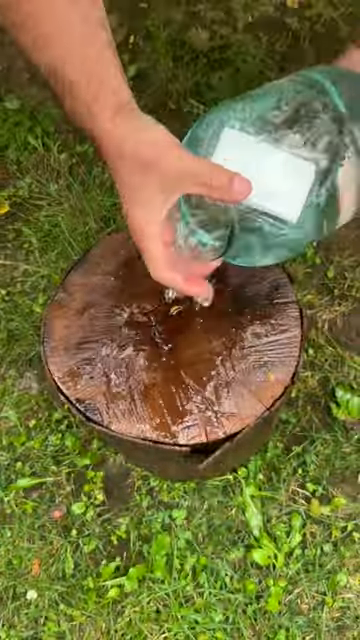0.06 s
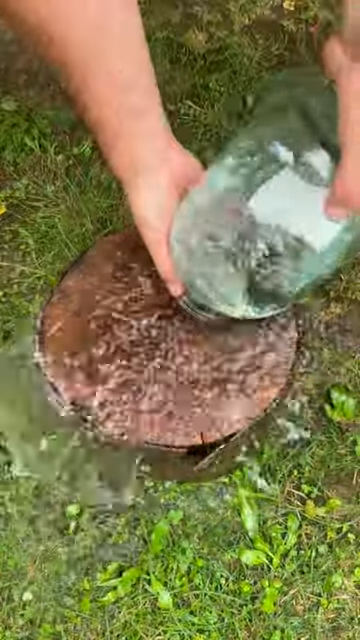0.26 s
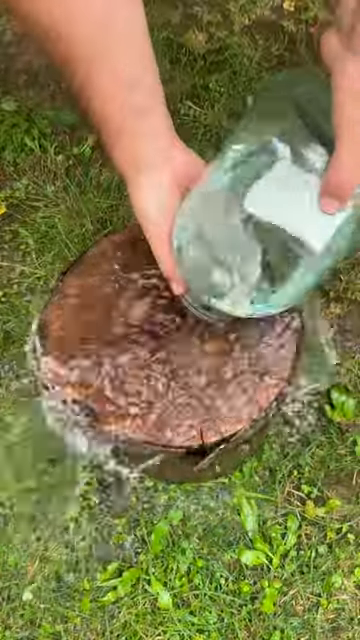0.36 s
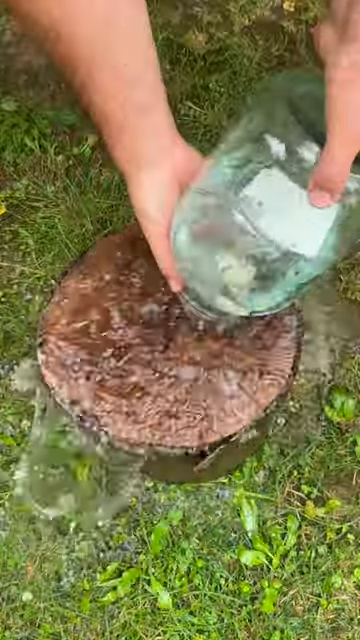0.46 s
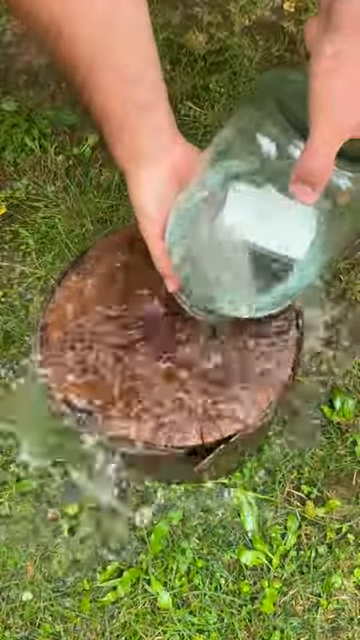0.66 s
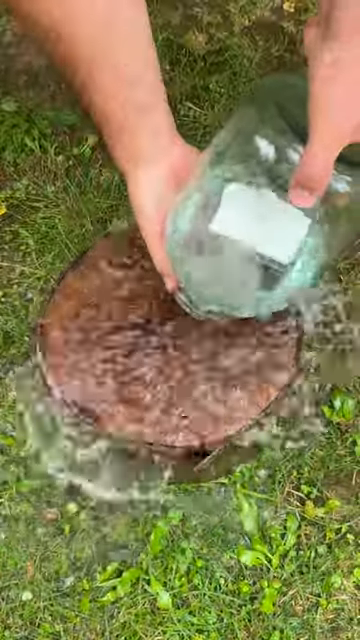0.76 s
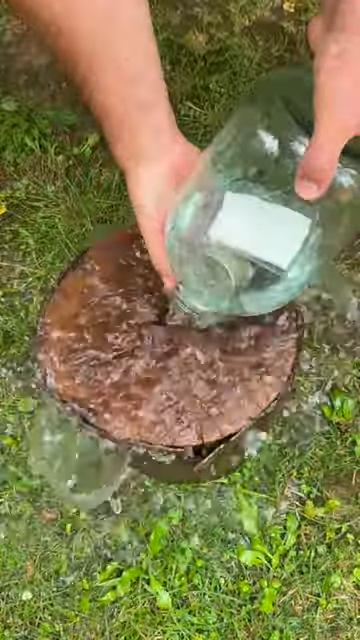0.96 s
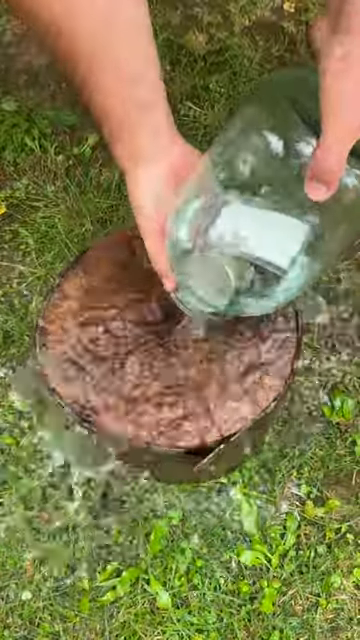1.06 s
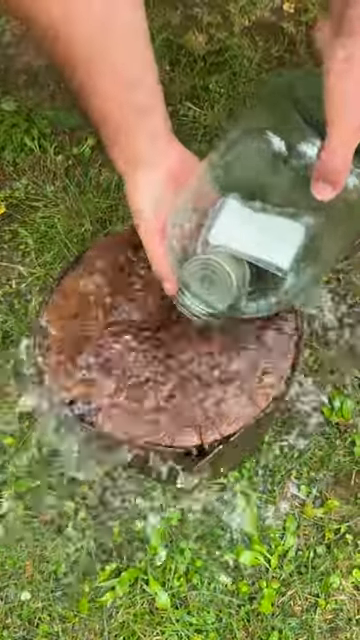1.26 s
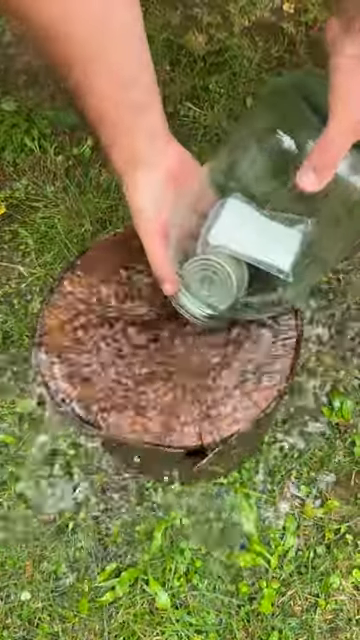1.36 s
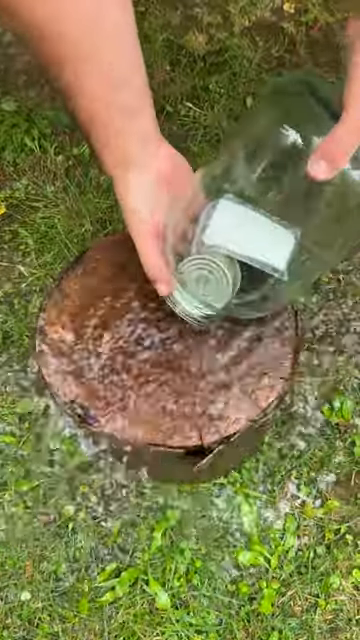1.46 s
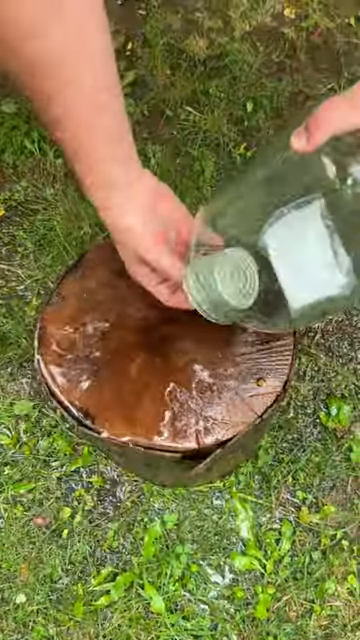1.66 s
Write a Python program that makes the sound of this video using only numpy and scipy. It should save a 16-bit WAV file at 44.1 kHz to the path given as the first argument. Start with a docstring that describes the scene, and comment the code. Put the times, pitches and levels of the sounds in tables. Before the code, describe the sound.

Gurgling water pours out of a glass jar, spattering on wood and grass outdoors.

```python
"""Over faint open air and a low drumming, water spatters on a stump and wet grass at arm's length.
It pours from a big upended glass jar: air gulps in through the neck in falling bubble notes and low
thumps, while water churns inside, slaps the glass and makes it ring. The flow thins to a patter,
and the empty jar knocks lightly in the hands. A puff of wind dies away on the microphone pair."""
import sys
import numpy as np
from scipy import signal
from scipy.fft import rfft, irfft, next_fast_len
from scipy.io import wavfile
from scipy.ndimage import map_coordinates

SR = 44100
rng = np.random.default_rng(int(sys.argv[2]) if len(sys.argv) > 2 else 0)


def pcm_store(signal):
    """Save signal as 16-bit PCM."""
    levels = np.round(np.clip(np.atleast_2d(signal), -1, 1) * 32767)
    wavfile.write(sys.argv[1], SR, levels.astype(np.int16).T)


N = 74970
T = np.arange(SR // 5) / SR  # time within one short sound [s]


def amp(db):
    return 10 ** (np.asarray(db) / 20)


def unit(x):
    return x / np.sqrt(np.mean(x ** 2) + 1e-20)


def along(points, hz):
    """Read (frequency, value) points on a log axis."""
    f, v = np.transpose(points)
    return np.interp(np.log(hz + 1), np.log(f + 1), v)


def level(rows):
    """Gain per sample from (time [s], level [dB]) points."""
    return amp(np.interp(np.arange(N) / SR, *np.transpose(rows)))


def wobble(per_s, size):
    """A smooth random curve with per_s knots a second."""
    return map_coordinates(rng.standard_normal(size), [np.arange(size) * per_s / SR], mode="wrap")


def filtered(x, response):
    """Filter x by a function of frequency."""
    n = x.shape[-1]
    padded = next_fast_len(n + 4096)
    return irfft(rfft(x, padded) * response(np.fft.rfftfreq(padded, 1 / SR)), padded)[..., :n]


def coloured(x, spectrum):
    """x shaped by a spectrum, at rms 1."""
    return unit(filtered(x, lambda hz: amp(along(spectrum, hz))))


def noise(spectrum, size):
    """Noise with a spectrum, at rms 1."""
    return coloured(rng.standard_normal(size), spectrum)


def noise_band(hz, octaves):
    """A short noise around one pitch, at rms 1."""
    white = rng.standard_normal(len(T))
    return unit(filtered(white, lambda f: 1 / (1 + (np.log2((f + 1) / hz) / octaves) ** 2) ** 2))


def add(track, s, sound):
    """Mix a sound into a track at time s."""
    i = max(0, round(s * SR))
    track[i:i + len(sound)] += sound[:max(0, N - i)]


def swell(seconds):
    """Rises to 1 in the given time, then dies away."""
    u = T / seconds
    return (u * np.exp(1 - u)) ** 2


def decay(t60):
    """Falls 60 dB in t60 seconds."""
    return amp(-60 * T / t60)


def tone(hz):
    """A sine that follows a pitch curve."""
    return np.sin(2 * np.pi * (np.cumsum(hz) / SR + rng.random()))


# Likeness of the sound at the two microphones (frequency [Hz], correlation [0-1])
MIC_LIKENESS = [(1000, 0.98), (7000, 0.97), (8200, 0.77)]

def spread(pair):
    """Two unrelated signals become a partly alike left and right."""
    turn = lambda hz: np.arccos(np.clip(along(MIC_LIKENESS, hz), -1, 1)) / 2
    mid, side = filtered(pair, lambda hz: np.array([np.cos(turn(hz)), np.sin(turn(hz))]))
    return np.array([mid + side, mid - side])


# Open air all around the stump (frequency [Hz], level [dB])
AIR_SPECTRUM = [(25, -57), (55, -22), (100, -8), (1200, -15), (15000, -41)]

def outdoors(air_db=-56, wind_hz=54.3, wind_db=-46.5, fade_db_per_s=22):
    """Faint open air and a dying puff of wind on the microphone."""
    wind_band = lambda hz: 1 / (1 + (2 * np.log2((hz + 1) / wind_hz)) ** 4)
    puff = unit(filtered(rng.standard_normal(N), wind_band))
    air = spread(noise(AIR_SPECTRUM, (2, N)))
    return amp(air_db) * air + amp(wind_db - fade_db_per_s * np.arange(N) / SR) * puff


# Drumming from the ground under the jar (time [s], level [dB])
DRUM_LEVEL = [(0, -52), (.22, -47.5), (.26, -42.5), (.6, -40.5), (1.05, -36), (1.25, -49), (1.6, -46.5),
              (1.7, -50)]
# Its deep colour (frequency [Hz], level [dB])
DRUM_SPECTRUM = [(25, -24), (50, -10.5), (75, 1.5), (170, -3.5), (350, -15), (2000, -58)]

def drumming():
    """Falling water drums low on stump and soil."""
    return level(DRUM_LEVEL) * noise(DRUM_SPECTRUM, N)


def bubble(hz, swell_s, fall, tail=0):
    """An air pocket rings, losing `fall` of log pitch per swell time; the share `tail` rings on."""
    t = T[T < 16 * swell_s]
    envelope = (1 - tail) * swell(swell_s) + tail * swell(3 * swell_s)
    pitch = hz * np.exp(-fall * (np.minimum(t / swell_s, 6) - 1))
    return envelope[:len(t)] * tone(pitch)


def bubbles(per_s, centre_hz, octaves, swell_cycles, spread_db, fall):
    """A random stream of bubbles around one pitch, at rms 1."""
    out = np.zeros(N)
    for when, pitch, size in rng.random((int(per_s * N / SR), 3)):
        hz = centre_hz * 2 ** (octaves * (2 * pitch - 1))
        add(out, when * N / SR, amp(spread_db * size) * bubble(hz, swell_cycles / hz, fall))
    return unit(out)


# Spatter on the stump and the grass around it (time [s], level [dB])
SPATTER_LEVEL = [(.11, -65), (.168, -37.5), (.26, -36), (.42, -41), (.59, -35), (.765, -40), (.99, -35),
                 (1.235, -45.5), (1.27, -35.5), (1.33, -42.5), (1.42, -37), (1.455, -47.5), (1.55, -41),
                 (1.58, -60.5), (1.7, -66)]
# Bright spray, heard close (frequency [Hz], level [dB])
SPRAY_SPECTRUM = [(600, -16), (1800, -4), (3000, -3.5), (5300, -5.5), (7500, -5.5), (11000, -1),
                  (16000, -4.5)]

def spatter(drops_per_s=2200, drop_spread_db=4.5):
    """Clumps of droplet clicks and fine wet hiss, with the pings of tiny bursting bubbles."""
    hits = rng.random((2, N)) < drops_per_s / SR
    sizes = amp(drop_spread_db * np.minimum(rng.standard_normal((2, N)), 2))
    signs = rng.choice([-1, 1], (2, N))
    clicks = amp(-1.5) * coloured(hits * sizes * signs, SPRAY_SPECTRUM)
    hiss = amp(-4) * noise(SPRAY_SPECTRUM, (2, N))
    clumps = amp(4.4 * np.tanh(wobble(260, N)) + 1.84 * wobble(45.26, N))
    pings = bubbles(per_s=420, centre_hz=5200, octaves=0.59, swell_cycles=3, spread_db=18.5, fall=0)
    return level(SPATTER_LEVEL) * (unit(spread(clicks + hiss) * clumps) + amp(-7.5) * pings)


# Single drops on the stump, close by (time [s], relative level [dB], centre pitch [Hz])
BIG_DROPS = [(.116, -21, 3540), (0.158, -21.5, 7600), (0.3238, -19, 5140), (0.467, -19, 5060),
             (0.481, -14.5, 5200), (0.7407, -22, 4700), (0.875, -20.5, 5430), (1.1758, -21.5, 4500),
             (1.2514, -23, 5900), (1.29, -19, 10900), (1.3398, -20.5, 3060), (1.4355, -24, 5400),
             (1.533, -22, 4570)]

def splats(gain_db=-10):
    """Big drops burst on the wet wood: a sharp smack and a softer tail."""
    out = np.zeros(N)
    envelope = swell(0.00069) + 0.5 * swell(0.0028)
    for s, db, hz in BIG_DROPS:
        add(out, s, amp(db + gain_db) * noise_band(hz, octaves=0.73) * envelope)
    return out


# Churning inside the jar (time [s], level [dB])
CHURN_LEVEL = [(.14, -69), (.168, -33.5), (.19, -59), (.228, -42.5), (.26, -21), (.308, -35), (.39, -31.5),
               (.425, -38.5), (.6, -34.5), (.765, -44), (.81, -30.5), (.9, -44.5), (.97, -34.5),
               (1.09, -46), (1.14, -50), (1.48, -62)]
# Its wash of water (frequency [Hz], level [dB])
WASH_SPECTRUM = [(35, -57), (220, -1), (1400, 1), (2200, -2), (6000, -31)]

def churn():
    """Many small bubbles on a wash of tumbling water."""
    gurgle = bubbles(per_s=380, centre_hz=1071, octaves=1.172, swell_cycles=2.7, spread_db=39, fall=0.11)
    water = spread(noise(WASH_SPECTRUM, (2, N)))
    wash = unit(water * amp(4.7 * wobble(130, N)))
    return level(CHURN_LEVEL) * (amp(-8.5) * gurgle + amp(-3.5) * wash)


GULP_FALL = 0.0342  # log pitch lost per swell time
# Air bubbles in the neck, at arm's length (time [s], pitch [Hz], level [dB], swell [ms])
NECK_BUBBLES = [(0.2344, 1170, -17.5, 1.73), (0.2453, 2086, -12, 1.6), (.245, 914, -15, 1.46),
                (0.2548, 595.6, -12.5, 5.3), (.283, 590, -34, 1.8), (.295, 336, -24, 3.5),
                (0.3237, 1485, -15.5, 1.46), (.343, 1170, -18, 0.97), (.355, 1185, -27.5, 3),
                (.367, 800, -23, 3.6), (.403, 1400, -22.5, 3.8), (.44, 890, -27, 1.9),
                (.447, 734, -19, 4.07), (.473, 1500, -28.5, 8.6), (.582, 1060, -22.5, 1.5),
                (.614, 1490, -21, 1.8), (0.631, 1166, -25, 4.4), (.66, 790, -17.5, 2.2),
                (.663, 526, -22, 2.5), (.741, 1462, -18, 1.2), (.927, 347, -19.5, 0.88),
                (1.007, 593, -29, 2.8), (1.073, 646, -26.5, 3.1), (1.075, 287, -21.5, 2.1),
                (1.176, 1610, -30, 3.5), (1.218, 1743, -35.5, 3.4), (1.283, 1180, -35.5, 1.9),
                (1.313, 1240, -38, 2.8), (1.362, 1815, -32.5, 2.1)]

def glugs():
    """Air breaks in through the neck: falling bubble notes with froth around their pitch."""
    out = np.zeros(N)
    for s, hz, db, ms in NECK_BUBBLES:
        froth = 0.38 * swell(ms / 1000) * noise_band(hz, octaves=0.66)
        add(out, s, amp(db) * bubble(hz, ms / 1000, GULP_FALL, tail=0.11))
        add(out, s, amp(db) * froth)
    return out


def glass_ring(modes, scatter_db=2, waver=0.011):
    """Struck modes vary in strength from blow to blow; water on the glass keeps detuning them."""
    out = np.zeros(len(T))
    for hz, db, t60 in modes:
        gain = amp(db + rng.normal(0, scatter_db))
        out += gain * decay(t60) * tone(hz * (1 + waver * wobble(180, len(T))))
    return out


# Water striking the jar's inner wall (time [s], level [dB], main ring pitch [Hz])
WALL_SLAPS = [(0.258, -27, 2440), (.442, -28.5, 2400), (0.5125, -29, 2280), (0.5645, -21, 2430),
              (0.5815, -16, 2360), (0.6312, -23, 2373), (0.658, -19.5, 2315), (0.7097, -20, 2365),
              (0.774, -20, 2460), (0.7895, -19.5, 2390), (0.843, -26.5, 2460), (0.9241, -29.5, 2450),
              (0.9407, -19, 2610), (0.958, -14.5, 2440), (0.99, -23.5, 2546), (1.031, -30, 2550),
              (1.0488, -16, 2624), (1.068, -23, 2595), (1.084, -27.5, 2660), (1.1, -28.5, 2660)]
# The jar's other modes with the main ring at nominal_hz (pitch [Hz], level [dB], 60 dB decay [s])
JAR_MODES = [(1421, -18.5, 0.062), (3398, -9, 0.044), (3794, -19.5, 0.11)]
# The wet crack of a slap (frequency [Hz], level [dB])
CRACK_SPECTRUM = [(40, -4), (400, 3), (3200, -6), (6000, -5), (15000, -58)]

def slaps(nominal_hz=2484, waver=0.0081, split=0.0436, attack_s=0.0012):
    """Water falls back on the glass; sloshing makes the main ring waver and split into close tones."""
    out = np.zeros(N)
    attack = 1 - np.exp(-T / attack_s)
    for s, db, hz in WALL_SLAPS:
        pitch = hz * (1 + waver * wobble(235, len(T)))
        side_tones = tone(pitch * (1 + split)) + tone(pitch * (1 - split))
        main = decay(t60=0.059) * (tone(pitch) + amp(-7) * side_tones)
        shift = np.sqrt(hz / nominal_hz)  # the emptying jar's other modes rise half as fast
        others = glass_ring([(f * shift, gain, t60) for f, gain, t60 in JAR_MODES])
        crack = amp(-4) * decay(t60=0.019) * noise(CRACK_SPECTRUM, len(T))
        add(out, s, amp(db) * attack * (main + others + crack))
    return out


# Low gulps inside the jar (time [s], pitch [Hz], level [dB], swell [ms])
LURCHES = [(0.51, 182, -28, 5.6), (0.704, 157, -22, 2.9), (0.86, 112, -24, 4.7), (0.951, 113, -27, 15),
           (1.021, 97, -26.5, 13.5)]

def thumps():
    """The water column lurches with a low, falling note."""
    out = np.zeros(N)
    for s, hz, db, ms in LURCHES:
        add(out, s, amp(db) * bubble(hz, ms / 1000, GULP_FALL))
    return out


# The jar knocking in the hands, at arm's length (time [s], level [dB])
HAND_KNOCKS = [(1.588, -31), (1.595, -30), (1.626, -35), (1.6485, -27), (1.665, -37.5)]
# The thud of a knock (frequency [Hz], level [dB])
THUD_SPECTRUM = [(100, -9), (450, -2), (1200, -5.5), (2500, -27.5), (15000, -28)]
# Modes of the empty jar (pitch [Hz], level [dB], 60 dB decay [s])
EMPTY_JAR_MODES = [(3570, -16.5, 0.12), (5450, -22.5, 0.14)]

def knocks():
    """Dull knocks on the empty jar, with a thin glassy ring."""
    out = np.zeros(N)
    for s, db in HAND_KNOCKS:
        thud = amp(-0.5) * decay(t60=0.024) * noise(THUD_SPECTRUM, len(T))
        add(out, s, amp(db) * (thud + glass_ring(EMPTY_JAR_MODES)))
    return out


def echo(near, gain_db=-12.5, build_s=0.0066):
    """Stump, ground and jar scatter a short tail back to the microphones."""
    tails = rng.standard_normal((2, len(T))) * decay(t60=0.09) * (1 - np.exp(-T / build_s))
    tails /= np.linalg.norm(tails[0])
    return amp(gain_db) * spread(signal.fftconvolve(near[None], tails, axes=1)[:, :N])


def scene():
    """Jar and splashes at arm's length, over a stump in the open."""
    near = splats() + glugs() + slaps() + thumps() + knocks()
    return outdoors() + drumming() + spatter() + churn() + near + echo(near)


# Left microphone over right (frequency [Hz], level [dB])
MIC_BALANCE = [(220, 0), (640, 3.3), (1000, 6.3), (1500, 6.5), (2300, 0)]
# Left microphone ahead of right (frequency [Hz], phase [rad])
MIC_PHASE = [(250, 0), (850, -.5), (1400, 0), (7200, 0), (11000, 1.55), (15500, 3)]

def record(dry, low_cut_hz=41, top_hz=15950):
    """The microphone pair leans left in the midrange, shifts phase, sheds deep bass and top treble."""
    def response(hz):
        left = amp(along(MIC_BALANCE, hz) / 2) * np.exp(0.5j * along(MIC_PHASE, hz))
        passband = (hz < top_hz) / (1 + (low_cut_hz / (hz + 1)) ** 4)
        return np.array([left, 1 / left]) * passband
    return filtered(dry, response)


dry = scene()
out = record(dry)
pcm_store(out)
```